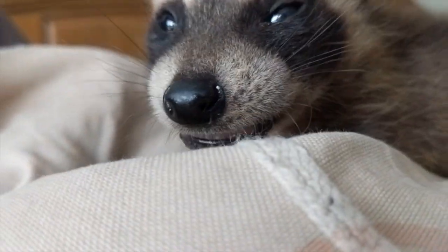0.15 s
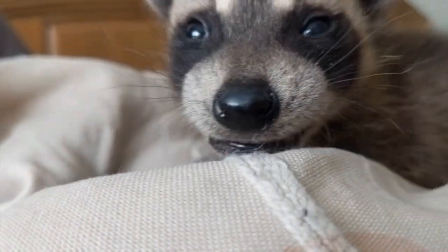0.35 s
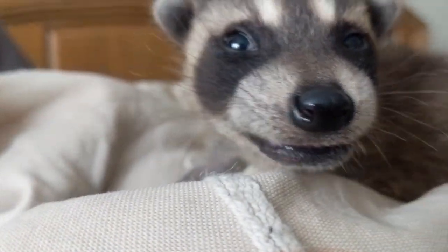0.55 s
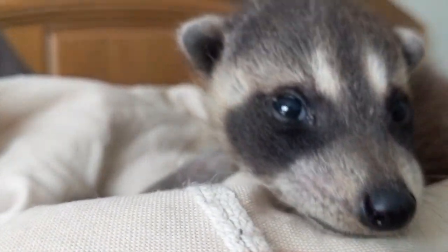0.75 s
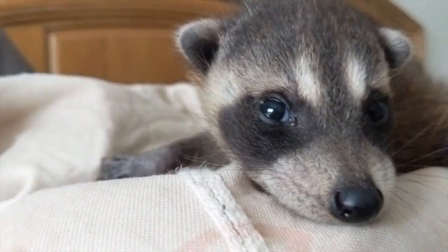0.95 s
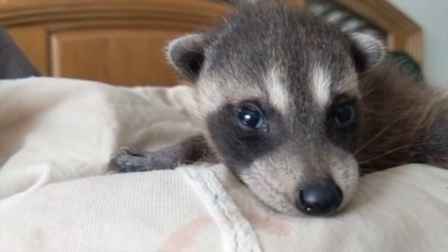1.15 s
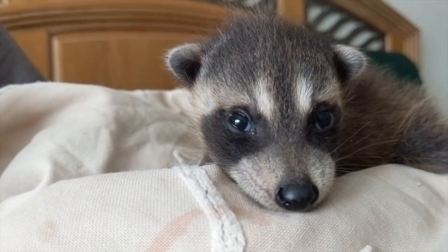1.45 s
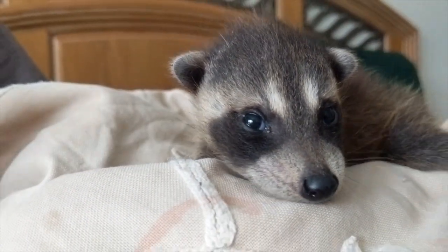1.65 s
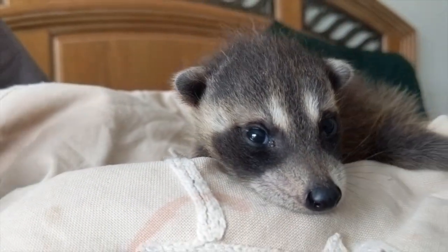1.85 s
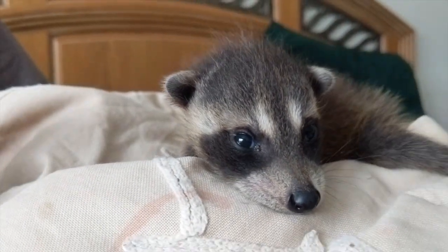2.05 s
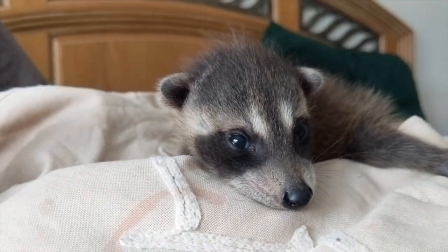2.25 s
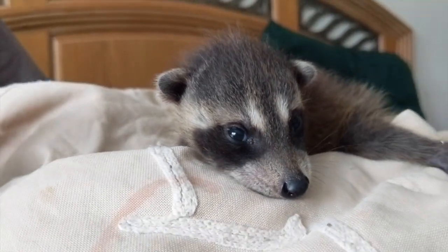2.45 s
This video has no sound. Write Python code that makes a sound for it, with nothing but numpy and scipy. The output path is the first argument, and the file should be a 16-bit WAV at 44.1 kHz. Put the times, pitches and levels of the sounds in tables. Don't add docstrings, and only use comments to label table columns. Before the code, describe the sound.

A baby raccoon chitters close up in three raspy, chirping bursts, each quieter than the first

```python
import sys
import numpy as np
from scipy import signal
from scipy.fft import rfft, irfft, next_fast_len
from scipy.io import wavfile
from scipy.ndimage import map_coordinates

SR = 44100
rng = np.random.default_rng(int(sys.argv[2]) if len(sys.argv) > 2 else 0)


def wav_out(sig):
    wavfile.write(sys.argv[1], SR, np.round(np.clip(np.atleast_2d(sig).T, -1, 1) * 32767).astype(np.int16))


def to_linear_factor(level_db):
    exponent = np.asarray(level_db, float) / 20
    return 10 ** exponent


N = 114660


def unit(x):
    return x / np.sqrt(np.mean(x ** 2) + 1e-20)


def wobble(n, rate):
    knots = rng.standard_normal(200 + int(n > SR) * 4000)
    return map_coordinates(knots, [np.arange(n) * rate / SR], mode="wrap")


def filtered(x, response):
    m = next_fast_len(N + SR // 16)
    return irfft(rfft(x, m) * response(np.fft.rfftfreq(m, 1 / SR)), m)[..., :N]


def resonate(x, peaks):
    def cavity(f, center_hz, width_hz):
        loss = 1j * f * 2 * width_hz
        return (loss / (center_hz * center_hz - f * f + loss)) ** 3

    return filtered(x, lambda f: sum(to_linear_factor(db) * cavity(f, c, w) for c, w, db in peaks))


def add(track, s, x):
    track[round(s * SR):][:len(x)] += x


def folds(hz):
    phase = 2 * np.pi * np.cumsum(hz) / SR
    k = np.arange(2, 40)[:, None]
    pulses = np.sum(np.cos(k * phase) * (k * hz < 16000), axis=0) * np.sqrt(2 * hz / 1000)
    second = to_linear_factor(-3) * np.cos(2 * phase) / (1 + (hz / 690) ** 10)
    tone = np.sqrt(2) * (np.cos(phase - 1) + second)
    gate = (1 + np.cos(phase)) ** 2 / 2
    return tone, pulses, gate


# time_s, coo_overtones_db, treble_db
MOUTH = [(.19, -14, -16), (.26, -6, 9.5), (.35, -2, 5), (.44, 1, 7), (.61, -4, 7.5), (.626, 0.5, -13),
         (.642, 0, 5.5), (.72, -10, 10), (1.3, -15.5, -4), (1.52, -9, -12.5), (1.66, -16.5, -20),
         (2.2, -16, -20), (2.3, -10.5, -17), (2.42, -16.5, 3.5), (2.55, -22, -4)]


def mouth_gain(column):
    rows = np.transpose(MOUTH)
    return to_linear_factor(np.interp(np.arange(N) / SR, rows[0], rows[column]))


# start_s, length_s, first_hz, last_hz, level_db
COOS = [(0.188, .022, 844, 1083, -39.5), (0.244, 0.044, 932, 1122, -47), (0.332, 0.033, 907, 1129, -45.5),
        (0.408, 0.044, 856, 1240, -44.5), (0.491, 0.049, 781, 1194, -45.5), (0.575, 0.026, 1027, 766, -59),
        (0.596, 0.021, 926, 1143, -51), (0.615, 0.036, 1593, 1533, -61.5), (0.677, 0.0191, 985, 890, -55),
        (0.694, 0.032, 939, 1102, -53), (1.335, 0.028, 766, 974, -51), (1.412, 0.024, 760, 862, -52.5),
        (1.434, 0.013, 994, 1010, -48), (1.44, 0.029, 1163, 1210, -54), (1.49, 0.012, 750, 966, -55),
        (1.501, 0.044, 947, 1084, -47), (1.537, 0.0077, 1197, 1156, -46.5), (1.579, 0.028, 812, 800, -64),
        (1.597, 0.021, 605, 686, -58.5), (1.612, 0.043, 1012, 890, -57.5), (2.193, 0.023, 736, 1070, -50),
        (2.256, 0.028, 718, 628, -67), (2.271, 0.017, 637, 705, -60.5), (2.287, 0.025, 900, 1031, -49),
        (2.31, 0.018, 1132, 1182, -44), (2.331, 0.015, 1137, 1080, -65), (2.351, 0.017, 752, 1005, -56.5),
        (2.363, 0.027, 1010, 940, -59.5), (2.381, 0.043, 629, 1120, -55), (2.477, 0.025, 927, 736, -60),
        (2.5, 0.017, 845, 947, -60)]
# pitch_hz, width_hz, level_db
COO_THROAT = [(1920, 1060, -6), (3040, 400, -3.5), (4040, 290, -11), (6600, 5900, -22.5)]
# pitch_hz, width_hz, level_db
COO_TEETH = [(9600, 360, -12), (11300, 680, -15)]


def coos():
    edge_s, bend, jitter = .004, 1.5, 0.0443
    swell_range_db, shimmer_db, rasp = 15.5, 2, .5
    tone, pulses = np.zeros((2, N))
    t = np.arange(int(.07 * SR)) / SR
    n = len(t)
    for start, length, first_hz, last_hz, db in COOS:
        u = np.clip(t / length, 0, 1)
        hz = first_hz + (last_hz - first_hz) * u ** bend
        base, overtones, gate = folds(hz * (1 + jitter * wobble(n, 375.0)))
        swell_db = swell_range_db * (u - 1) * np.clip((last_hz / first_hz - 1) * 5, 0, 1)
        fade_in = np.clip(t / (2 * edge_s), 0, 1)
        fade_out = np.clip((length - t) / edge_s + .5, 0, 1)
        shape = to_linear_factor(db + swell_db + shimmer_db * wobble(n, 206.5)) * fade_in * fade_out
        add(tone, start, shape * base)
        breathy = overtones + rasp * gate * rng.standard_normal(n)
        add(pulses, start, shape * breathy * to_linear_factor(2.4 * wobble(n, 283)))
    pulses = pulses * mouth_gain(1)
    return tone + resonate(pulses, COO_THROAT) + resonate(0.17 * pulses * mouth_gain(2), COO_TEETH)


# peak_s, rise_s, top_hz, level_db, overtones_db
CHIRPS = [(0.22, .01, 1233, -41, -14), (.303, 0.0033, 1348, -42, -1), (0.383, .003, 1520, -43, 3.5),
          (0.463, .014, 1508, -42, 6), (0.55, .015, 1470, -41.5, 5), (0.647, 0.0062, 1473, -41.5, 5),
          (1.383, .002, 1172, -49.5, -12.5), (1.465, 0.0041, 1383, -48, -9), (1.555, .01, 1318, -44, -11),
          (2.227, 0.00354, 1248, -43.5, -14), (2.329, .004, 1160, -48.5, -15.5),
          (2.445, 0.0022, 1263, -45.5, -15.5)]
# pitch_hz, width_hz, level_db
CHIRP_THROAT = [(1980, 580, 1.5), (2586, 698, 7), (4270, 260, -18), (5290, 520, -24)]
# pitch_hz, width_hz, level_db
CHIRP_TEETH = [(9220, 890, -5.5), (10030, 800, -17.5), (11500, 1030, -16.5)]


def chirps():
    glide_hz_per_s, swell_db_per_s, jitter, rasp = 16000, 817, 0.005, .45
    collapse_s, creak_hz, shut_s = .004, 420, 0.011
    tone_t60_s, creak_t60_s = 0.023, 0.023
    tone, pulses = np.zeros((2, N))
    for peak, rise, top_hz, db, over_db in CHIRPS:
        t = np.arange(int(.05 * SR)) / SR - rise
        before, after = np.minimum(t, 0), np.maximum(t, 0)
        squeeze = 2.5 + over_db / 8.5
        climb_hz = top_hz + glide_hz_per_s * np.clip(squeeze + 0.089, 0, 1) * before
        hz = creak_hz + (climb_hz - creak_hz) * np.exp(-(after / collapse_s) ** 1.22)
        unsteady = (jitter + 14.0 * after) * np.tanh(wobble(len(t), 390))
        base, overtones, gate = folds(hz * (1 + unsteady))
        closing = np.exp(-(after / (shut_s * np.clip(squeeze / 1.12, .45, 1))) ** 3)
        shape = np.clip((t + rise) / 0.00041, 0, 1) * to_linear_factor(db) * closing
        swell_db = swell_db_per_s * before
        tone_db = 0.45 * (squeeze - 2.1) * swell_db - 60 * after / tone_t60_s
        add(tone, peak - rise, base * shape * to_linear_factor(tone_db))
        noise = rasp * gate * rng.standard_normal(len(t)) * (1 + after / 0.0042)
        pulse_db = over_db + (squeeze - 0.77) * swell_db - 60 * after / creak_t60_s
        add(pulses, peak - rise, (overtones + noise) * shape * to_linear_factor(pulse_db))
    return tone + resonate(pulses, CHIRP_THROAT) + resonate(pulses * mouth_gain(2), CHIRP_TEETH)


# start_s, length_s, level_db, back_cavity_db, front_cavity_db
BREATHS = [(.191, 0.019, -56, 1, -13), (0.215, 0.035, -59.5, -27, -16), (0.243, 0.049, -49.5, -13, -2),
           (0.331, 0.039, -46.5, -21, -7), (0.41, 0.041, -46, -22, -2.5), (0.492, 0.07, -49.5, -15, -0.5),
           (0.576, 0.036, -49, -12, 3.5), (0.611, 0.025, -62, -14, 1.5), (0.672, 0.055, -57, -5.5, 5),
           (1.302, 0.013, -69.5, 3, -5), (1.335, 0.02, -70.5, -13, -8), (1.364, .011, -72, 4.5, -1),
           (1.415, 0.024, -68, -14, -6), (1.444, .021, -70, 0, 0), (1.495, 0.063, -65, -5.5, -5.5),
           (1.585, 0.072, -69.5, -1.5, -2.5), (2.186, 0.035, -72, 5.5, -7), (2.258, 0.032, -71, -11, -7),
           (2.284, 0.034, -69.5, 6, -5), (2.36, 0.043, -75, 2, 1.5), (2.407, 0.045, -75, 2.5, 2),
           (2.475, 0.04, -74, -2.5, -6)]
# back_hz, middle_hz, front_hz, throat_db
SHAPES = [(6630, 9200, 12000, 0.5), (6600, 9300, 12000, 0), (6400, 9070, 9660, -1.5),
          (6450, 9400, 10900, -7), (6540, 8940, 11000, -1.5), (6100, 9300, 11400, 1),
          (5770, 8500, 11500, 0), (6500, 9000, 11800, 2), (5900, 8730, 11600, 4.5), (7460, 9800, 12000, -6),
          (6900, 9900, 12300, 4), (7100, 9100, 11400, 7), (7050, 10300, 12500, 5), (6800, 10600, 12200, -9),
          (6400, 10800, 12300, 1.5), (6300, 10000, 11900, 4), (6440, 9500, 11300, 4),
          (7500, 10300, 12300, 1.5), (6600, 9700, 11500, 1.5), (6300, 10000, 11900, 6),
          (6740, 9400, 11200, 3), (6400, 10000, 12000, 1)]
# pitch_hz, width_hz, level_db
AIR_THROAT = [(1390, 1100, -6), (2433, 480, 1), (4040, 440, -1.5)]


def breaths():
    swell_s, edge_s, flutter_depth_db, grain_db = .007, .0022, 2.2, 2.5
    out, t = np.zeros(N), np.arange(int(.1 * SR)) / SR
    n = len(t)
    for breath, mouth_shape in zip(BREATHS, SHAPES):
        start, length, db, back_db, front_db = breath
        back_hz, middle_hz, front_hz, throat_db = mouth_shape
        air = np.zeros(N)
        shape = np.clip(t / swell_s, 0, 1) * np.clip((length - t) / edge_s + 1, 0, 1)
        flutter_db = flutter_depth_db * wobble(n, 118) + grain_db * wobble(n, 900)
        add(air, start, 1.875 * to_linear_factor(db + flutter_db) * shape * rng.standard_normal(n))
        cavities = [(back_hz, 1000, back_db), (middle_hz, 450, 0), (front_hz, 1100, front_db)]
        throat = [(c, w, level + throat_db) for c, w, level in AIR_THROAT]
        out = out + resonate(air, cavities + throat)
    return out


# time_s, peak_db
CLICKS = [(0.16, -54), (0.2274, -42), (0.2481, -38), (0.3268, -47), (0.3314, -47), (0.3904, -35),
          (0.4026, -50), (0.408, -46), (0.478, -47), (0.4836, -40), (0.4955, -46), (0.5702, -52),
          (0.5749, -45), (0.664, -48), (0.67, -52), (0.6714, -55), (0.674, -43), (1.3139, -55.5),
          (1.381, -59), (2.1594, -68), (2.2243, -43), (2.4425, -49.5)]
# pitch_hz, width_hz, level_db
CLICK_MOUTH = [(1870, 1000, 4.5), (3030, 490, 5), (4250, 320, 0), (9100, 800, -5.5), (11800, 1300, -13)]


def clicks():
    t60_s = .007
    out, t = np.zeros(N), np.arange(int(.1 * SR)) / SR
    for s, db in CLICKS:
        add(out, s, to_linear_factor(db - 60 * t / t60_s) * rng.standard_normal(len(t)))
    return resonate(out, CLICK_MOUTH)


def taps(rows, t60, sag):
    out, t = np.zeros(N), np.arange(int(.05 * SR)) / SR
    for s, db, hz in rows:
        life, turns = t60(hz), 2 * np.pi * hz * t
        envelope = to_linear_factor(-60 * t / life) * (1 - np.exp(-8.0 * t / life))
        ring = envelope * 2 * np.sin(turns * (1 + sag * np.exp(-t * hz)))
        snap = 2.2 * np.exp(-turns / 2.13) * np.sin(2.46 * turns)
        add(out, s, to_linear_factor(db + 11.5) * (ring + 0.2 * snap))
    return out


# time_s, peak_db, pitch_hz
TICKS = [
    (0.162, -51, 1130),
    (1.314, -52.5, 990),
    (2.159, -61.5, 1210),
]


def ticks():
    return taps(TICKS, lambda hz: .0065, 0.58)


# time_s, peak_db, pitch_hz
GULPS = [(.290, -52, 386), (.372, -61, 420), (.445, -61, 327), (.634, -58.5, 516), (.705, -59.5, 690),
         (1.369, -52, 333), (1.450, -53, 380), (2.221, -56, 403), (2.314, -57, 400), (2.431, -55, 400)]


def gulps():
    return taps(GULPS, lambda hz: 0.014, 0.27)


# time_s, peak_db, pitch_hz
KNOCKS = [(.548, -60, 79), (1.166, -63, 140), (1.190, -54.5, 136), (1.217, -49.5, 124), (2.159, -55, 133),
          (2.187, -54, 138), (2.447, -57, 59.4), (2.533, -57, 106)]


def knocks():
    return taps(KNOCKS, lambda hz: 3.55 / hz, 0.67)


# pitch_hz, level_db (per Hz)
ROOM = [(21, -41), (33, -9.5), (48, 0), (81, -0.5), (114, -3), (140, -7), (300, -11), (600, -20),
        (2000, -26.5), (15900, -41.5)]


def room():
    level_db, swing_db, low_cut_hz = -66, 1, 34.6
    f, db = np.transpose(ROOM)

    def colour(hz):
        curve = to_linear_factor(np.interp(np.log(hz + 1), np.log(f + 1), db))
        return curve * hz ** 3 / (hz ** 3 + low_cut_hz ** 3)

    def low(hz):
        return 1 / (1 + (hz / 250) ** 4)

    lumps = rng.standard_normal(N) * to_linear_factor(swing_db * wobble(N, 7.3))
    rumble = filtered(lumps, lambda hz: colour(hz) * low(hz))
    hiss = filtered(rng.standard_normal(N), lambda hz: colour(hz) * (1 - low(hz)))
    return to_linear_factor(level_db) * unit(rumble + hiss)


def scene():
    top_hz, echo_db, echo_t60_s = 15000, -27, .07
    animal = coos() + chirps() + breaths() + clicks() + ticks() + gulps()
    animal = filtered(animal, lambda hz: 1 / (1 + (hz / top_hz) ** 12))
    t = np.arange(SR // 8) / SR
    tail = rng.standard_normal(len(t)) * to_linear_factor(-60 * t / echo_t60_s) * (t > .003)
    echo = signal.fftconvolve(animal, tail / np.linalg.norm(tail))[:N]
    return (animal + to_linear_factor(echo_db) * echo + knocks() + room())[None]


def low_pass(x):
    return signal.sosfilt(signal.butter(12, 16020, fs=SR, output="sos"), x)


def record(dry):
    mix = filtered(dry, lambda hz: hz < 15980)
    return low_pass(mix)


dry = scene()
out = record(dry)
wav_out(out)
```